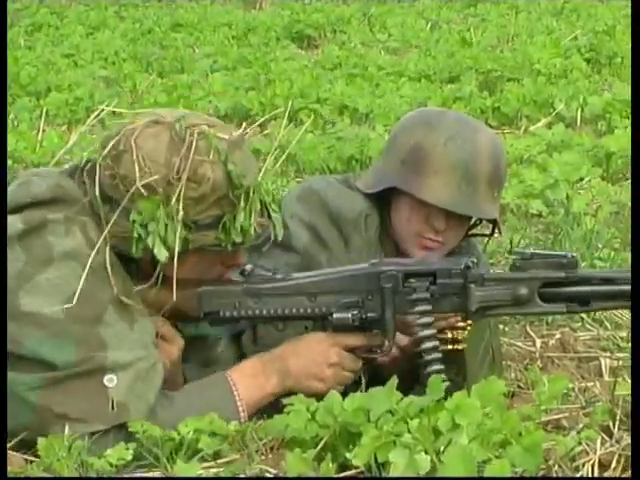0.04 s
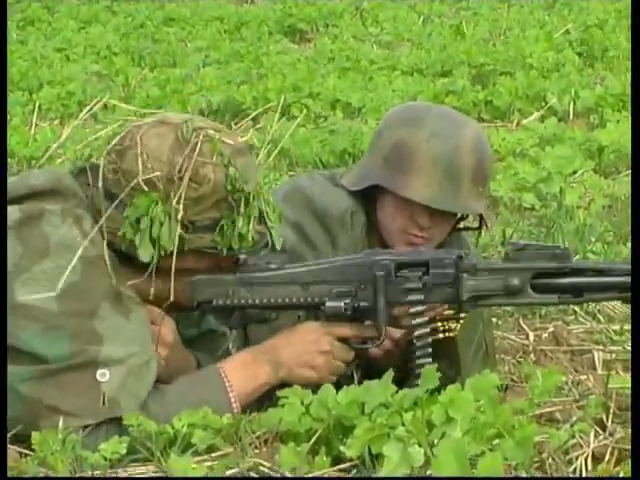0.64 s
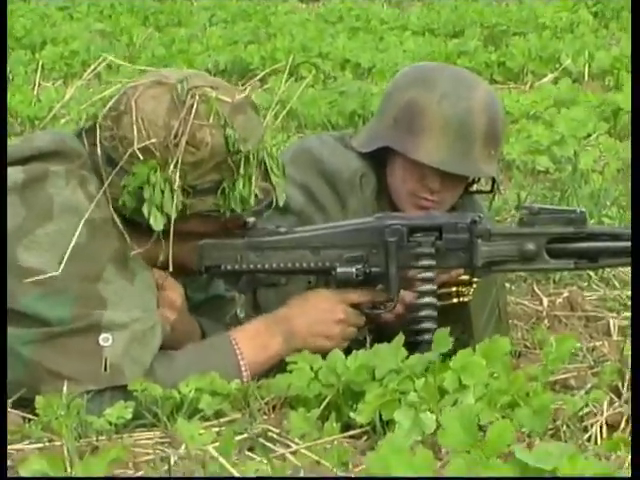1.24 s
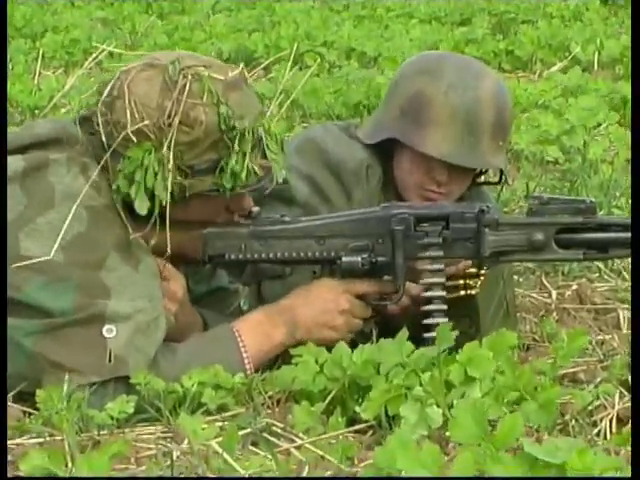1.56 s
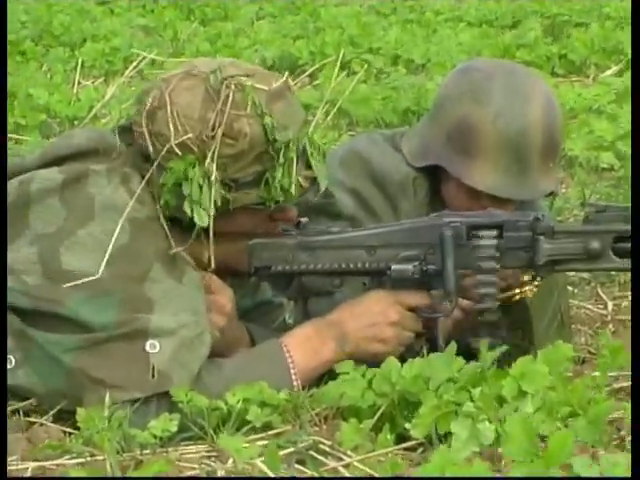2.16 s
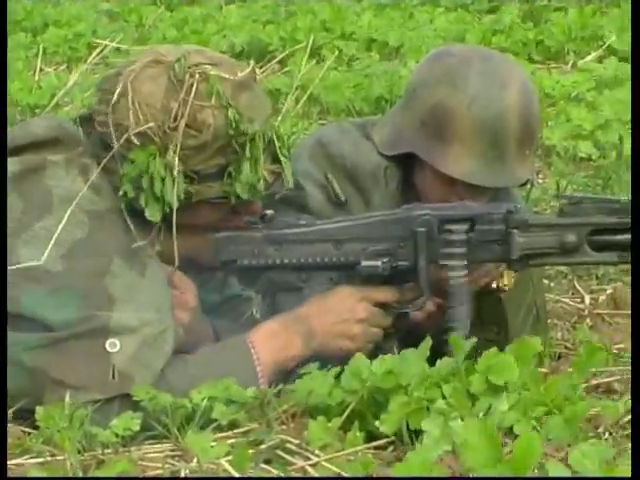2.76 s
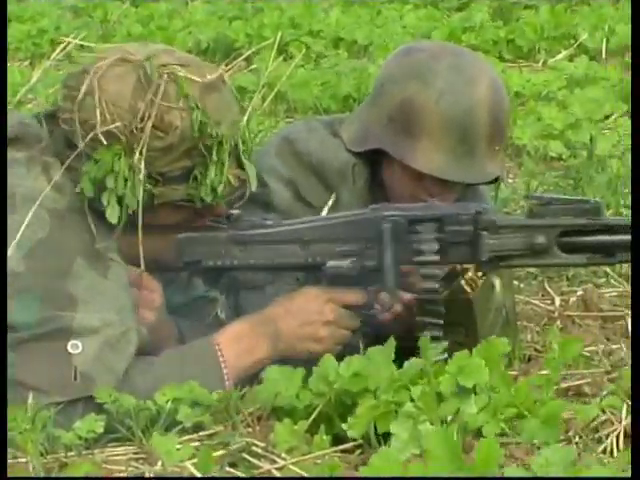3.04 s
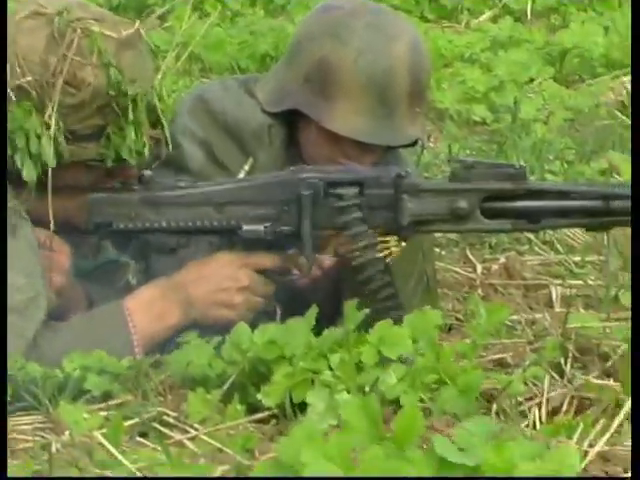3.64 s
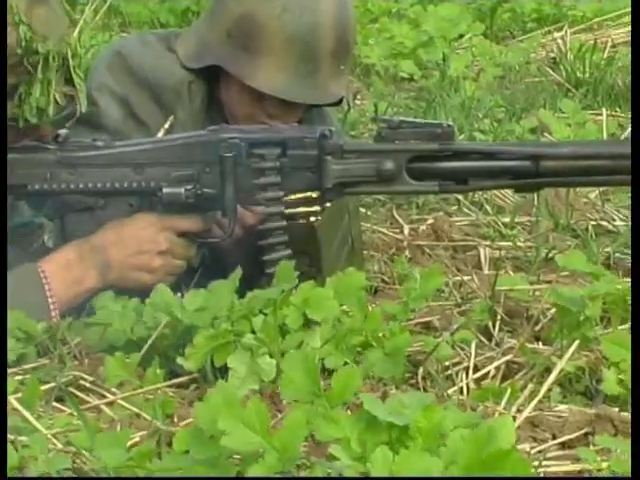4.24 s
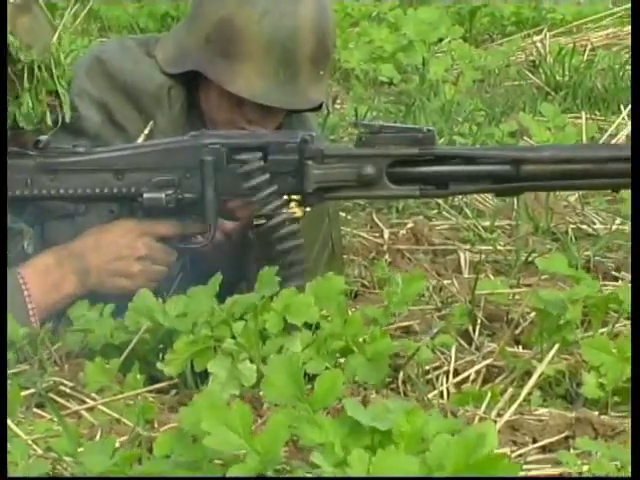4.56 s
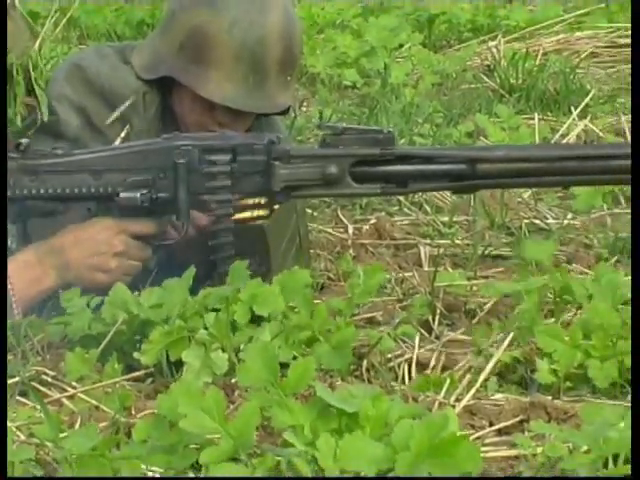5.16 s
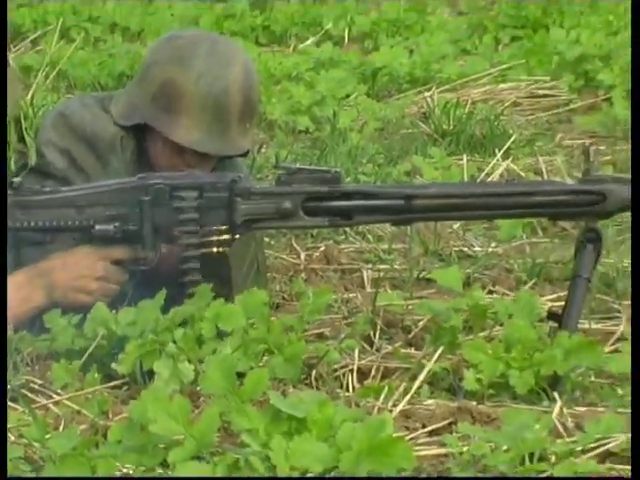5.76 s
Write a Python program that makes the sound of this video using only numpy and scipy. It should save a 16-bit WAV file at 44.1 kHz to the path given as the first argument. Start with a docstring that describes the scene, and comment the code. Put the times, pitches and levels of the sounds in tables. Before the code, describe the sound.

Low wind rumbles on the microphone in an open field, with faint rustling of cloth and leaves and one small click from an ammunition belt. Then a belt-fed machine gun close by fires eight short, very rapid bursts of blanks. Each shot is a sharp, slightly overloaded blast with a thump and clattering, ringing steel. Spent cases and links clink as they land, and the shots leave only a brief outdoor tail.

```python
"""Wind rumbles on a small stereo microphone, a gunner shifts in the leaves and a belt link snaps into place.
Then a belt-fed machine gun close by fires blanks in eight short bursts across an open field.
The bolt runs forward, picks up the belt and cycles about twenty times a second, held back at times by a
snag. Each shot is an overloading blast of gas with a thump, followed by the clatter and ring of the steel
action. Spent cases and links clink as they land."""
import sys
import numpy as np
from scipy import signal
from scipy.fft import rfft, irfft
from scipy.io import wavfile
from scipy.ndimage import uniform_filter1d

SR = 44100
rng = np.random.default_rng(int(sys.argv[2]) if len(sys.argv) > 2 else 0)


def master(y):
    """Save y as 16-bit WAV."""
    cut = np.clip(np.atleast_2d(y).T, -1, 1)
    pcm = np.round(cut * 32767)  # scale
    wavfile.write(sys.argv[1], SR, pcm.astype(np.int16))


N = 264600
TIME = np.arange(N) / SR

# spectrum of rustle, ticks and link snap (frequency [Hz], density [dB])
CRISP_COLOUR = [(500, -31), (1500, 4.5), (3000, 6), (6000, 2.5), (9000, -3), (12000, -13.5), (16000, -15)]
# belt link resonances (frequency [Hz], t60 [s])
LINK_MODES = [(2830, 0.033), (3950, 0.038)]
# trigger pulls (first shot [s], rounds [count], bolt cycle [s], rounds before snag [count, to be rounded],
# snag delay [s], run-up level [dB], clatter level [dB])
BURSTS = [(2.2431, 3, 0.051, 2, 0.00081, -17, -13.5), (2.684, 3, 0.056, 3, 0.005, -17, -13),
          (3.0774, 6, 0.05, 2, 0.0017, -20.5, -14.5), (3.5543, 4, 0.05, 2, 0.0069, -28.5, -14),
          (3.9212, 5, 0.049, 4, 0.00067, -30.5, -15.5), (4.5467, 3, .05, 1.5, 0, -31, -16),
          (4.980, 4, 0.05, 2.5, 0.00037, -29, -14.5), (5.4299, 5, 0.052, 3, 0.0051, -34, -16)]
# strength of steel ring and late scatter (time [s], gain [dB])
LINGER = [(2.4, 4.5), (3.4, 3.5), (4.15, -4), (4.4, -5.5), (4.75, -9.5), (5.3, -12), (5.7, 4), (5.9, -22.5)]


def from_db(db):
    """Decibels to gain."""
    return 10 ** (np.asarray(db) / 20)


def unit_rms(x):
    """Scale to rms 1."""
    return x / np.sqrt(np.mean(x ** 2) + 1e-20)


def level(rows):
    """Gain curve from rows of (time [s], level [dB])."""
    return from_db(np.interp(TIME, *np.transpose(rows)))


def at_hz(points, hz):
    """Read a table on a log-frequency axis."""
    table_hz, values = np.transpose(points)
    return np.interp(np.log(hz + 1), np.log(table_hz), values)


def noise(colour):
    """Stereo noise of a given spectrum, nearly alike in both channels; rms 1."""
    # left-right likeness (frequency [Hz], correlation [0..1])
    likeness = [(40, 1), (120, 0.85), (500, 0.9), (2000, 0.82), (5000, 0.96), (9000, 0.97), (14000, 0.69)]
    hz = np.arange(N // 2 + 1) * SR / N
    alike = np.clip(at_hz(likeness, hz), 0, .999)
    mid, side = rfft(rng.standard_normal((2, N)))
    pair = np.sqrt(1 + alike) * mid + np.sqrt(1 - alike) * side * [[1], [-1]]
    return unit_rms(irfft(pair * from_db(at_hz(colour, hz)), N))


def flutter(rate_hz, depth_db):
    """Random gain gliding between rate_hz values a second; rms 1."""
    wander = np.interp(TIME * rate_hz, np.arange(N), rng.standard_normal(N))
    return unit_rms(from_db(depth_db * wander))


def strikes(times_s, levels_db):
    """One impulse per event."""
    hits = np.zeros(N)
    samples = np.round(np.asarray(times_s) * SR).astype(int)
    np.add.at(hits, np.clip(samples, 0, N - 1), from_db(levels_db))
    return hits


def convolve(x, response):
    """Pass mono or stereo sound through a response."""
    return signal.fftconvolve(np.atleast_2d(x), np.atleast_2d(response), axes=-1)[:, :N]


def delayed(x, lag_s):
    """Shift later, same length."""
    count = int(lag_s * SR)
    return np.concatenate([np.zeros_like(x[..., :count]), x[..., :N - count]], axis=-1)


def decay(hits, t60_s):
    """Envelope that jumps at each impulse and dies away."""
    return signal.lfilter([1], [1, -from_db(-60 / (t60_s * SR))], hits + 1e-18)


def soften(envelope, rise_s):
    """Round the attack: a contact takes a moment to build."""
    return uniform_filter1d(envelope, int(rise_s * SR))


def ring(hits, hz, t60_s):
    """Resonator: a unit impulse starts a decaying sine of height 1."""
    radius, angle = from_db(-60 / (t60_s * SR)), 2 * np.pi * hz / SR
    return signal.lfilter([0, np.sin(angle)], [1, -2 * radius * np.cos(angle), radius ** 2], hits + 1e-18)


def wind(gust_db=-11.0, full_gust_db=-13.0):
    """Eddies rumble on the microphone; hard gusts add smaller, higher ones."""
    # gusting, then dying down (time [s], level [dB])
    gusts = [(0.0, -35.5), (0.91, -32), (1.26, -44.5), (1.34, -33.5), (1.45, -46), (1.56, -32), (1.59, -44),
             (1.69, -21.5), (1.72, -32.5), (1.89, -33), (1.93, -20.5), (2.22, -21.5), (2.42, -42.5),
             (2.53, -23), (2.85, -45.5), (3.03, -32), (3.2, -45), (4.4, -63.5), (6, -68)]
    # large and small eddy spectra (frequency [Hz], density [dB])
    rumble_colour = [(15, -17), (35, -3.5), (65, -0.5), (115, -1.5), (160, -6), (230, -17.5), (330, -35.5),
                     (600, -38.5), (2000, -94)]
    gust_colour = [(60, -29.5), (160, 3.5), (300, -3), (450, -14.5), (700, -29), (2000, -54)]
    strength = level(gusts)
    small_eddies = from_db(gust_db) * np.sqrt(strength / from_db(full_gust_db)) * noise(gust_colour)
    balance = from_db([[-.4], [.4]])
    return strength * (noise(rumble_colour) + small_eddies) * balance


def open_air():
    """A faint outdoor hush; its level drops steadily from about 2 s on."""
    # background (time [s], level [dB])
    fade = [(0, -51), (2.05, -51), (4.44, -60.5), (6, -69)]
    # its spectrum (frequency [Hz], density [dB])
    air_colour = [(30, -9.5), (150, 4.5), (400, 6.5), (800, 6), (1500, -1.5), (3000, -10), (6000, -16),
                  (10000, -24), (16000, -26.5)]
    return level(fade) * noise(air_colour)


def gunner():
    """Cloth brushes the leaves and dry stalks tick."""
    # stalk and cloth ticks (time [s], level [dB])
    tick_events = [(0.025, -43.5), (0.4309, -43), (0.462, -42), (0.5077, -44), (0.6230, -42)]
    # clothes and leaves (time [s], level [dB])
    rustle_levels = [(0, -56), (.5, -56.5), (1.35, -61.5), (1.53, -57.5), (1.7, -61), (2.2, -61)]
    ticks = decay(strikes(*np.transpose(tick_events)), t60_s=.014)
    rustle = level(rustle_levels) * flutter(rate_hz=410, depth_db=2.5)
    return (ticks + rustle) * noise(CRISP_COLOUR)


def brass(clink_db=-6.0, link_db=-44.0, bounce_s=.03, bounce_spread_s=.005, bounce_db=-9.5):
    """Cases and links land and bounce once; now and then a cartridge rings."""
    # landings (time [s], level [dB])
    landings = [(2.4957, -36), (2.5083, -20), (2.547, -29.5), (4.2413, -31.5), (4.353, -29.5),
                (4.7516, -30.5), (4.8, -32.5), (4.848, -31), (5.3383, -37), (5.8434, -37.5)]
    # ringing cartridges (time [s], frequency [Hz], level [dB])
    ping_events = [(.215, 9430, -49), (2.46, 9200, -47), (3.822, 9380, -38), (4.24, 7570, -41),
                   (4.884, 7820, -44.5), (5.955, 7800, -51.5)]
    times_s, levels_db = np.transpose(landings)
    bounces_s = times_s + bounce_s + bounce_spread_s * rng.standard_normal(len(times_s))
    hits = strikes(times_s, levels_db + clink_db) + strikes(bounces_s, levels_db + clink_db + bounce_db)
    envelope = soften(decay(hits, t60_s=.06), rise_s=.0017)
    # clink spectrum (frequency [Hz], density [dB])
    clink_colour = [(500, -8.5), (1400, -10.5), (2000, 3.5), (3000, 6.5), (4600, -2.5), (6000, 0),
                    (8000, -5), (11000, -19), (16000, -38)]
    clinks = envelope * flutter(rate_hz=350, depth_db=3.5) * noise(clink_colour)
    links = from_db(link_db) * sum(ring(clinks, hz, t60_s) for hz, t60_s in LINK_MODES)
    pings = sum(ring(strikes([at_s], [db]), hz, t60_s=.16) for at_s, hz, db in ping_events)
    return clinks + links + pings


def link_snap(at_s=.7378, snap_db=-28.5, link_db=-38.0):
    """The belt is eased: a link clicks into place and rings briefly."""
    snap = decay(strikes([at_s], [snap_db]), t60_s=.015) * noise(CRISP_COLOUR)
    return snap + from_db(link_db) * sum(ring(snap, hz, t60_s) for hz, t60_s in LINK_MODES)


def bolt_knocks(jerk_lead_s=.019, jerk_db=-17.0):
    """Bolt run-up, bolt catch and a snagged belt jerking free: rows of (time [s], level [dB])."""
    # sear lets go, bolt picks up belt (lead on first shot [s], level re run-up [dB])
    run_up = [(0.05065, 0.5), (0.032, 0.5)]
    # sear catches bolt, which rebounds (lag after last cycle starts [s], level re clatter [dB])
    catch = [(0.0216, -4.5), (0.04, -9)]
    rows = []
    for start_s, rounds, cycle_s, before_snag, snag_s, run_up_db, clatter_db in BURSTS:
        last_s = start_s + (rounds - 1) * cycle_s + snag_s
        freed_s = start_s + round(before_snag) * cycle_s + snag_s
        rows += [(start_s - lead_s, run_up_db + db) for lead_s, db in run_up]
        rows += [(last_s + lag_s, clatter_db + db) for lag_s, db in catch]
        rows.append((freed_s - jerk_lead_s, jerk_db))
    return rows


def fire(first_blast_db=-11, blast_db=-14, first_feed_boost_db=8.0, feed_db=-21):
    """Even bolt cycles, late after a snag: a row per shot of (time [s], blast, feed, clatter [dB])."""
    blast_spread_db, feed_spread_db = .5, 3.5
    rows = []
    for start_s, rounds, cycle_s, before_snag, snag_s, run_up_db, clatter_db in BURSTS:
        rows.append((start_s, first_blast_db, run_up_db + first_feed_boost_db, clatter_db))
        for k in range(1, rounds):
            late_s = snag_s if k >= round(before_snag) else 0
            rows.append((start_s + k * cycle_s + late_s, blast_db, feed_db, clatter_db))
    return np.array(rows) + rng.standard_normal((len(rows), 4)) * [0, blast_spread_db, feed_spread_db, 0]


def action(shots, feed_s=.019, feed_gain_db=-2.0, knock_gain_db=2.0):
    """The bolt drags the belt in, slams shut, recoils and hits its buffer: steel on steel."""
    # lock, unlock, feed lever, ejector, buffer (lag after shot [s], level re clatter [dB], t60 [s])
    bolt_cycle = [(-.002, 7, 0.017), (.002, 4.5, 0.076), (0.01, -1, 0.064), (0.0174, -0.5, .04),
                  (0.024, -11, 0.062)]
    # contact spectrum (frequency [Hz], density [dB])
    steel_colour = [(100, -16), (400, -11.5), (800, -5.5), (1300, -6.5), (1900, -1), (3300, 0.5), (4700, 0),
                    (5500, 3), (7600, 2), (8700, -3), (9700, -3.5), (11500, -12.5), (16000, -32)]
    times_s, _, feed_db, clatter_db = shots.T
    drag = np.sqrt(np.linspace(0, 1, int(feed_s * SR)))
    feed = convolve(strikes(times_s - feed_s, feed_db + feed_gain_db), drag)
    cycle = [decay(strikes(times_s + lag_s, clatter_db + db), t60_s) for lag_s, db, t60_s in bolt_cycle]
    knocks_s, knocks_db = np.transpose(bolt_knocks())
    knocks = decay(strikes(knocks_s, knocks_db + knock_gain_db), t60_s=.07)
    # unrelated contacts add in power
    force = np.sqrt(feed ** 2 + knocks ** 2 + sum(contact ** 2 for contact in cycle))
    return soften(force, rise_s=.003) * flutter(rate_hz=650, depth_db=2.5) * noise(steel_colour)


def steel_ring(contacts, coupling_db=-56.5):
    """Every contact feeds the long modes of receiver, belt and ammunition box."""
    # (frequency [Hz], gain [dB], t60 [s])
    steel_modes = [(430, -2.5, 0.76), (857.4, -10.5, 0.76), (1884, 1, 0.5), (2000, -5.5, 0.4),
                   (2260, -8, 0.45), (2830, -2, 0.31), (3100, -9.5, 0.25), (3630, -2, 0.38), (4190, 0, .22),
                   (5170, -0.5, .25), (5940, -1, 0.18), (6860, -10, .14), (7700, -6, .12), (7760, -3, 0.2)]
    ringing = sum(from_db(coupling_db + db) * ring(contacts, hz, t60_s) for hz, db, t60_s in steel_modes)
    return level(LINGER) * ringing


def blast(shots, crack_s=.00048, crack_db=3.5, gas_db=10.0, modes_db=12.0, spread_db=3.0):
    """A shock front and a jet of gas burst from the muzzle and ring its cavities."""
    # gas jet spectrum (frequency [Hz], density [dB])
    gas_colour = [(60, -15), (150, 2.5), (230, 1), (500, 2.5), (780, -4), (1200, -5), (2600, 0),
                  (4500, -3.5), (7500, -5.5), (10000, -10.5), (16000, -19.5)]
    # resonances of muzzle booster and nearby air (frequency [Hz], gain [dB], t60 [s])
    muzzle_modes = [(151, -28, 0.099), (265, -18, .03), (480, -28.5, 0.023), (539, -16, 0.029),
                    (1565, -13, 0.025), (2027, -10, 0.014), (2655, 0.5, 0.0053)]
    times_s, blast_db = shots.T[:2]
    hits = strikes(times_s, blast_db)
    n_wave = np.interp(TIME[:SR // 100], [0, crack_s, crack_s + 1 / SR], [1, -1, 0])
    crack = from_db(crack_db) * convolve(hits, n_wave)
    gas = from_db(gas_db) * decay(hits, t60_s=.022) * noise(gas_colour)
    cavities = np.zeros(N)
    for hz, db, t60_s in muzzle_modes:
        strengths_db = blast_db + modes_db + db + spread_db * rng.standard_normal(len(times_s))
        cavities += ring(strikes(times_s, strengths_db), hz, t60_s)
    return crack + gas + cavities


def thump(shots, push_hz=90.0, push_db=-17.5, puff_db=-22.5, low_cut_hz=17.0, spread_db=1.0):
    """Pressure pushes, sucks back and rebounds; the microphone's low cut turns the puff into a sway."""
    hits = strikes(shots[:, 0], spread_db * rng.standard_normal(len(shots)))
    age_s = TIME[:SR // 8]
    swell = lambda tau_s: (age_s / (2 * tau_s)) ** 2 * np.exp(2 - age_s / tau_s)
    push = from_db(push_db) * convolve(hits, swell(tau_s=.0032) * np.cos(2 * np.pi * push_hz * age_s))
    puff = from_db(puff_db) * convolve(delayed(hits, lag_s=.00079), swell(tau_s=.0038))
    low_cut = signal.butter(4, low_cut_hz, "high", fs=SR, output="sos")
    return signal.sosfilt(low_cut, push + puff)


def overload(pressure):
    """The microphone rounds off the strongest peaks."""
    return np.tanh(pressure)


def near_echo(sound, cutoff_hz=1166.0, gain_db=-6):
    """Something close by throws the blast back, dulled."""
    dull = signal.sosfilt(signal.butter(1, cutoff_hz, fs=SR, output="sos"), sound)
    return from_db(gain_db) * delayed(dull, lag_s=.0087)


def field(sound, early_db=-22.5, late_db=-21.0):
    """Plants and ground scatter the shots back: a quick tail and a longer one."""
    # scatter spectrum (frequency [Hz], density [dB])
    field_colour = [(60, 8), (200, -14), (500, -7.5), (1200, -1), (2000, -1), (3200, 3.5), (5000, 0),
                    (7800, -2), (10000, -5.5), (16000, -18.5)]

    def tail(t60_s):
        unit_energy = np.sqrt(np.log(1000) / (t60_s * SR))
        return noise(field_colour)[:, :SR] * from_db(-60 * TIME[:SR] / t60_s) * unit_energy

    scattered = delayed(sound, lag_s=.02)
    early = from_db(early_db) * convolve(scattered, tail(t60_s=.2))
    late = from_db(late_db) * convolve(scattered, tail(t60_s=.6))
    return early + level(LINGER) * late


def scene():
    """Gun, field, gunner and weather at the microphone."""
    shots = fire()
    reports, contacts = blast(shots), action(shots)
    gun = reports + near_echo(reports) + contacts
    gunfire = overload(gun + field(gun) + steel_ring(contacts))
    return gunfire + open_air() + thump(shots) + brass() + link_snap() + wind() + gunner()


def record(dry):
    """Clip at full scale, then cut the highest treble."""
    stopband_db, stopband_hz = 50, 16500
    low_pass = signal.cheby2(16, stopband_db, stopband_hz, fs=SR, output="sos")
    return signal.sosfiltfilt(low_pass, np.clip(dry, -1, 1))


dry = scene()
out = record(dry)
master(out)
```